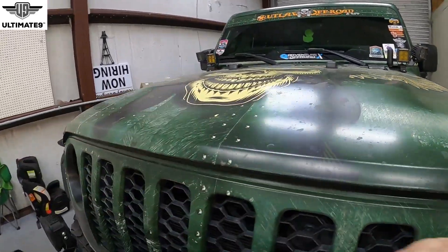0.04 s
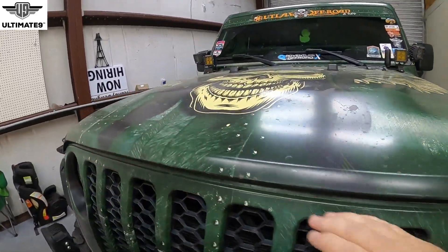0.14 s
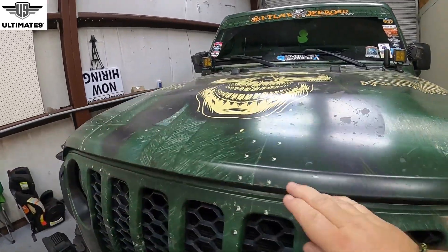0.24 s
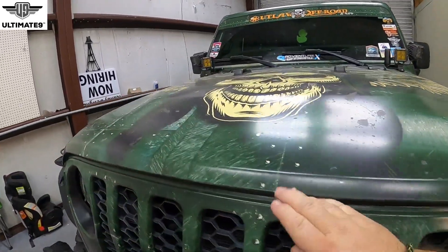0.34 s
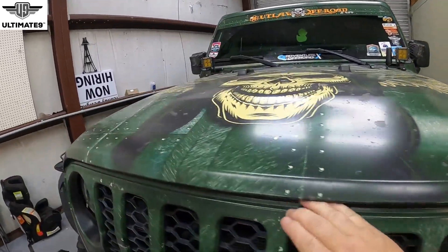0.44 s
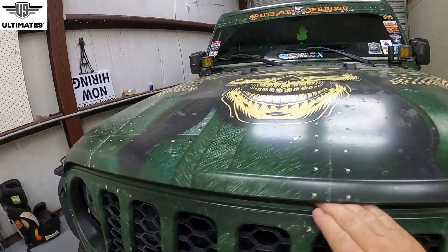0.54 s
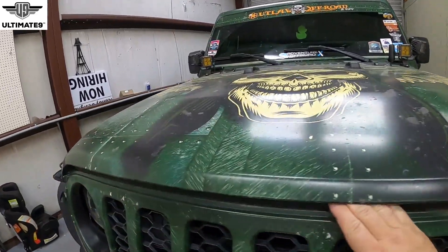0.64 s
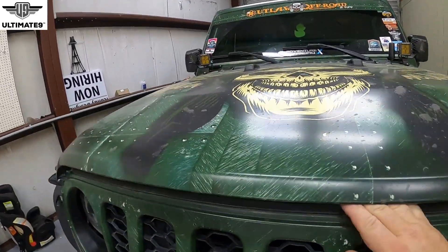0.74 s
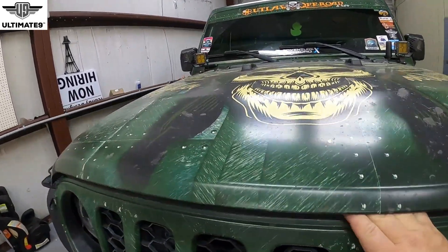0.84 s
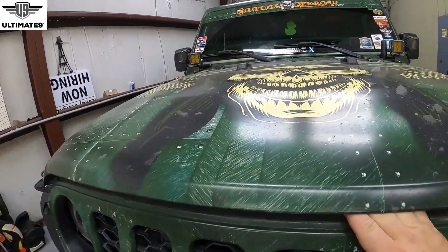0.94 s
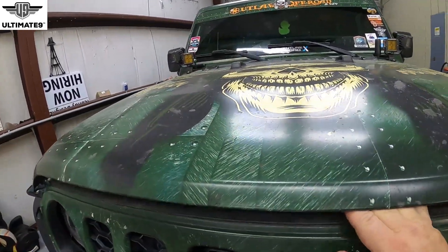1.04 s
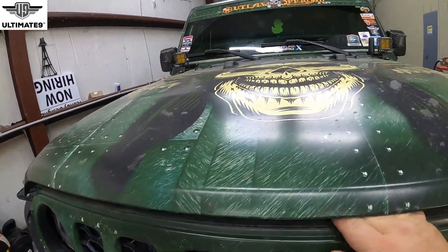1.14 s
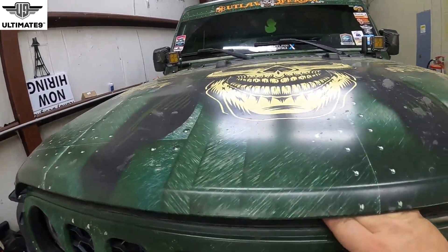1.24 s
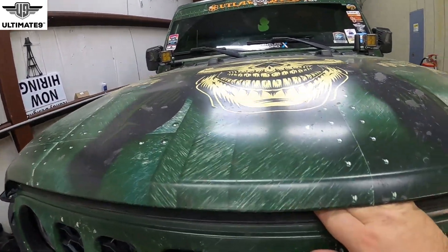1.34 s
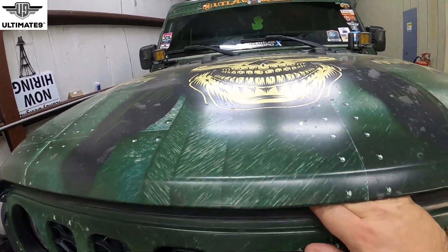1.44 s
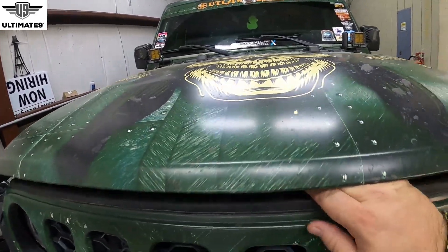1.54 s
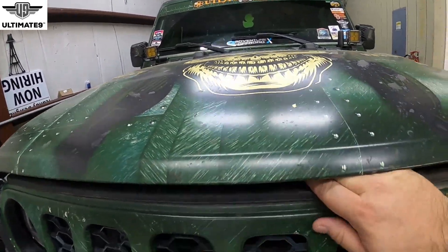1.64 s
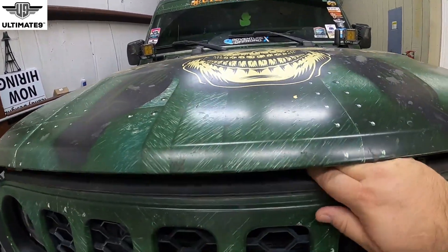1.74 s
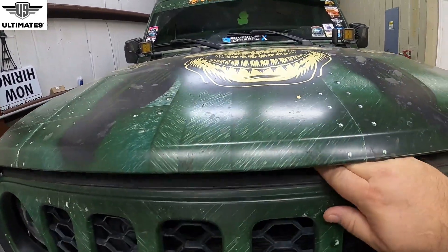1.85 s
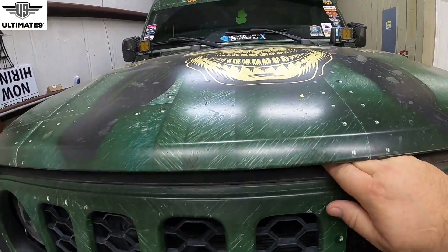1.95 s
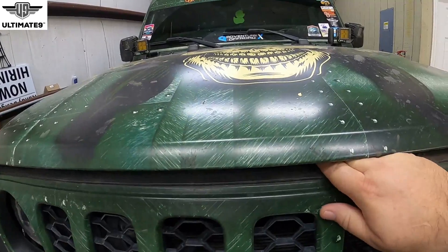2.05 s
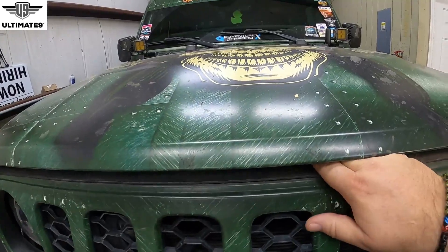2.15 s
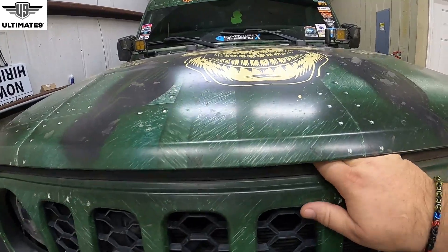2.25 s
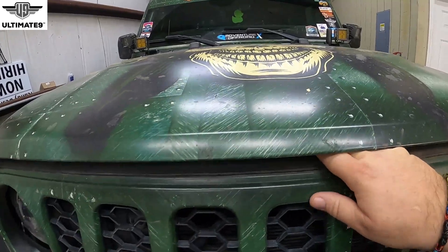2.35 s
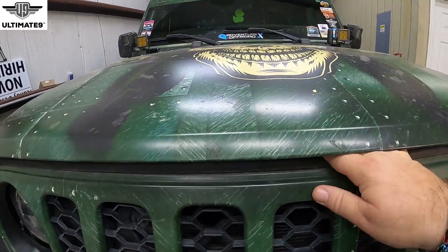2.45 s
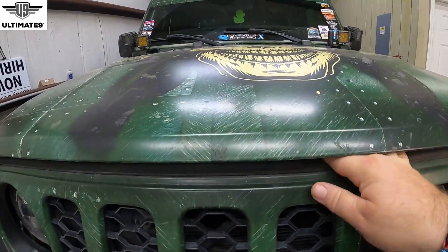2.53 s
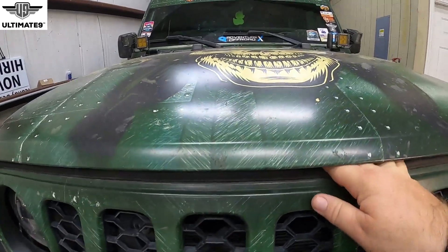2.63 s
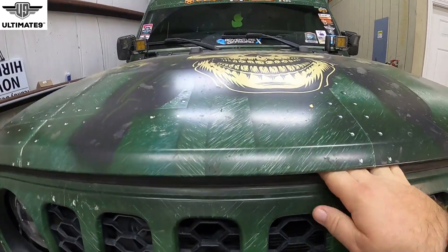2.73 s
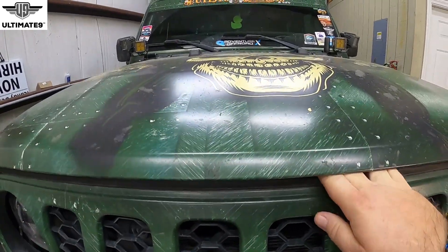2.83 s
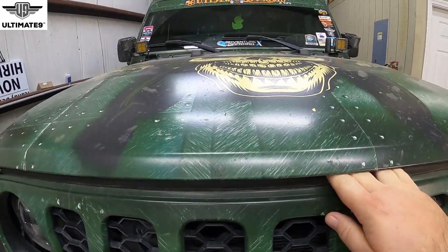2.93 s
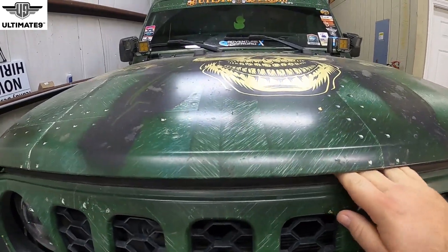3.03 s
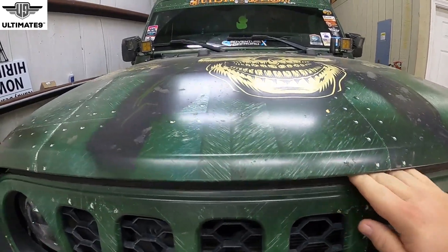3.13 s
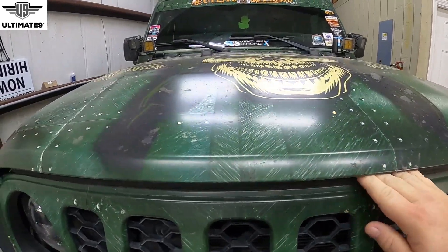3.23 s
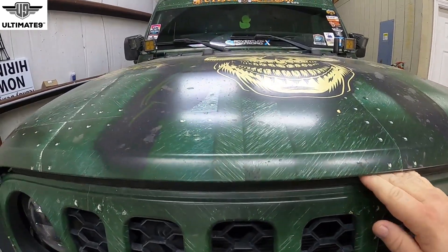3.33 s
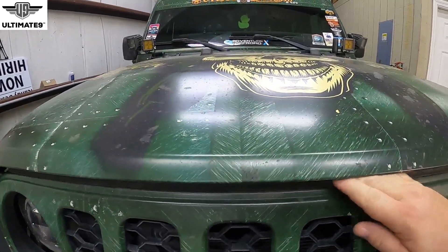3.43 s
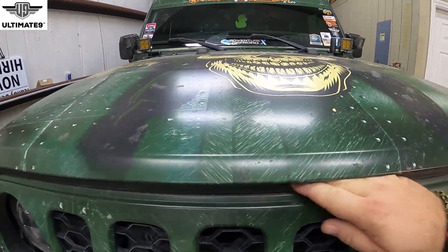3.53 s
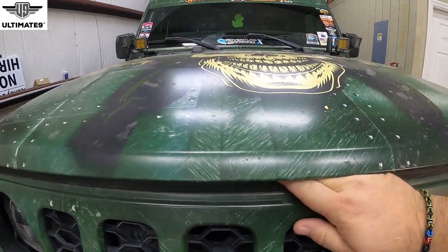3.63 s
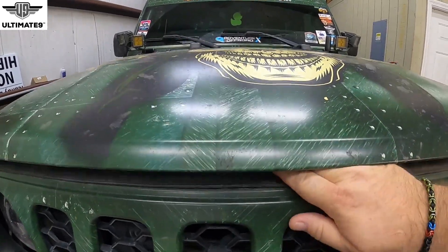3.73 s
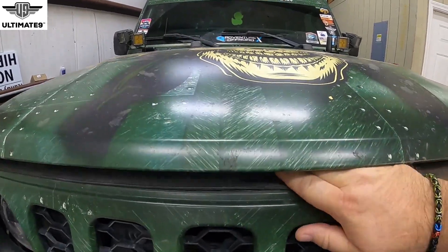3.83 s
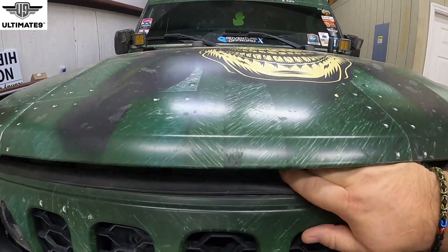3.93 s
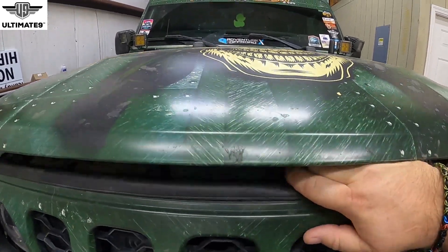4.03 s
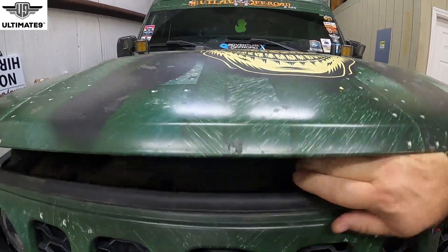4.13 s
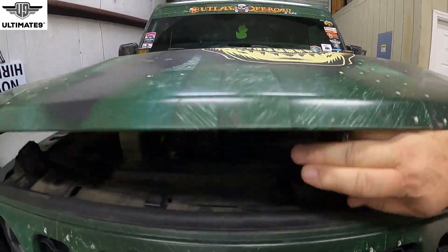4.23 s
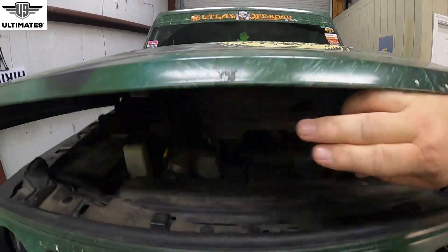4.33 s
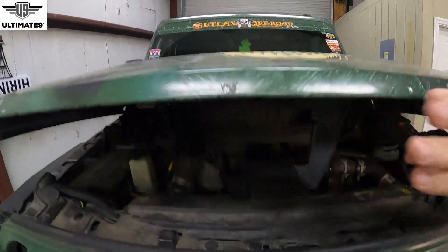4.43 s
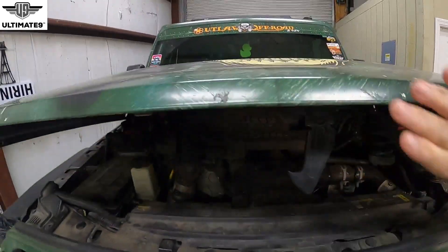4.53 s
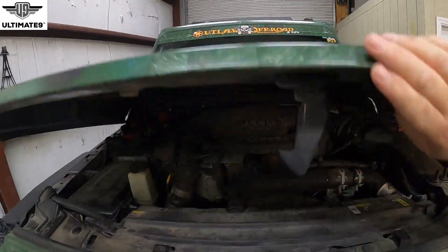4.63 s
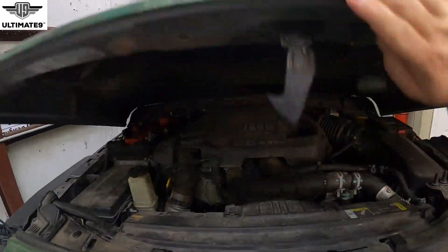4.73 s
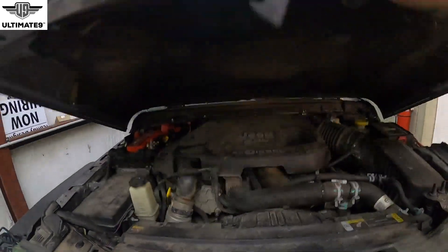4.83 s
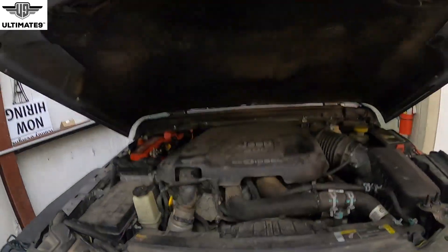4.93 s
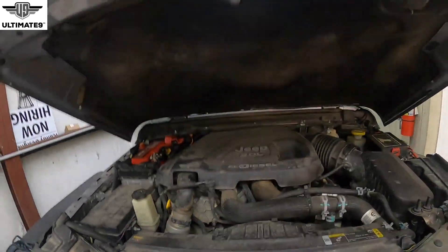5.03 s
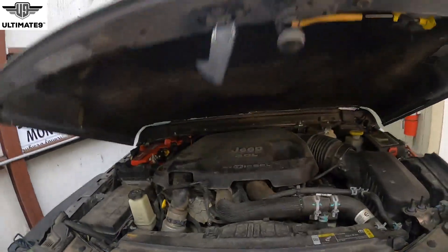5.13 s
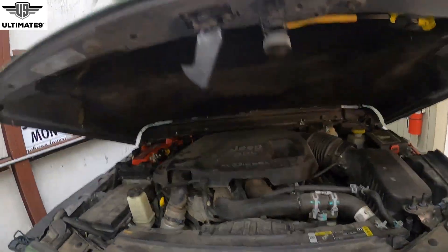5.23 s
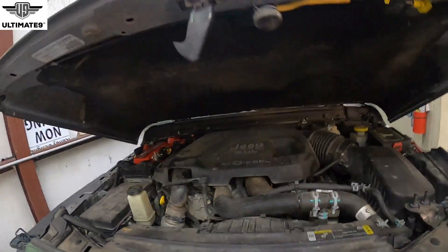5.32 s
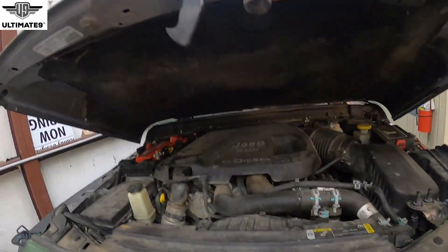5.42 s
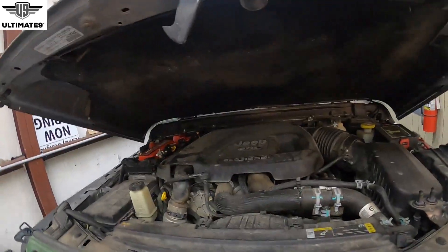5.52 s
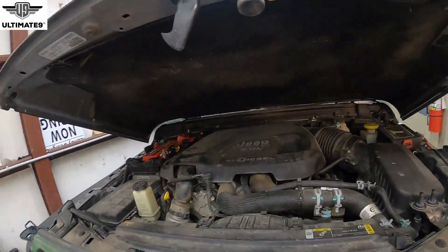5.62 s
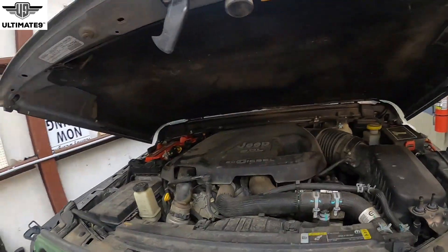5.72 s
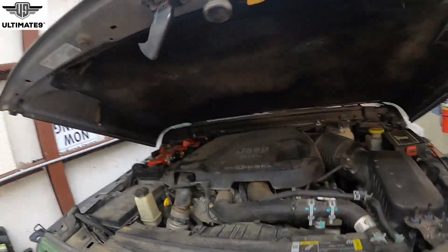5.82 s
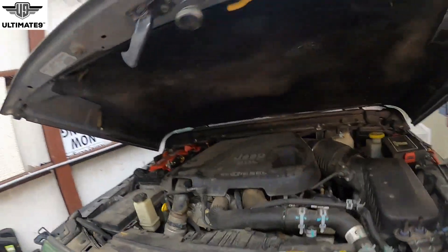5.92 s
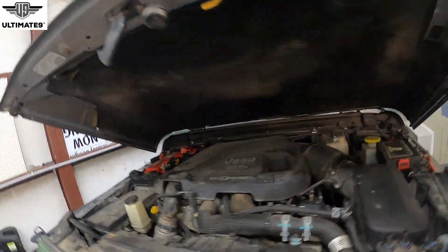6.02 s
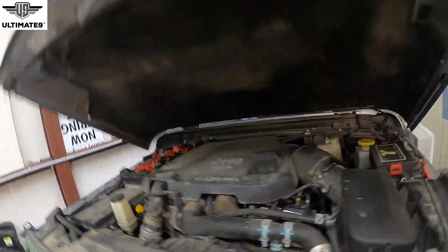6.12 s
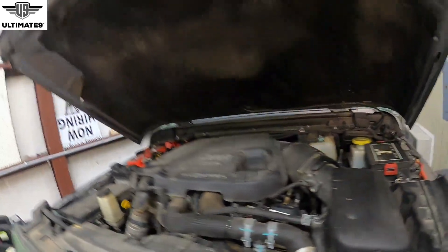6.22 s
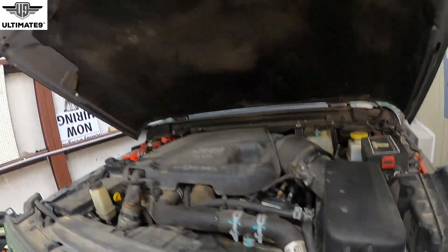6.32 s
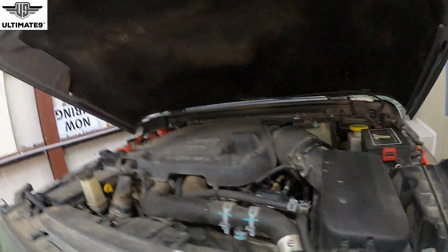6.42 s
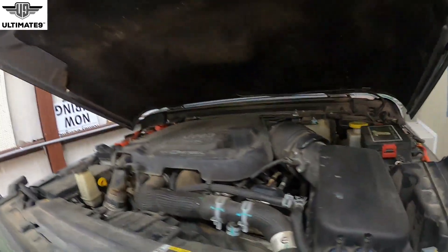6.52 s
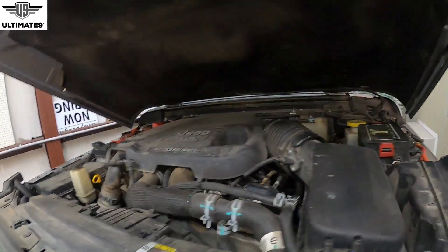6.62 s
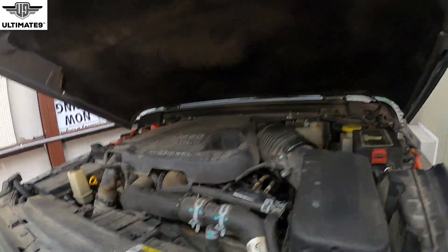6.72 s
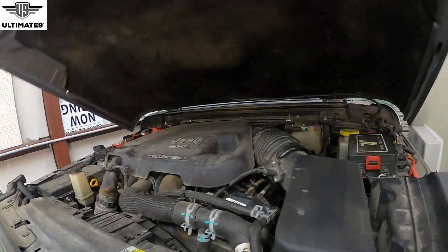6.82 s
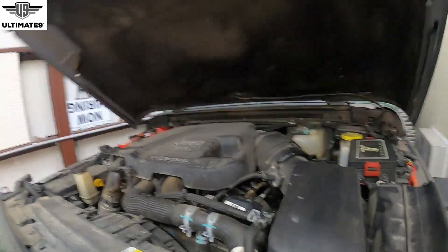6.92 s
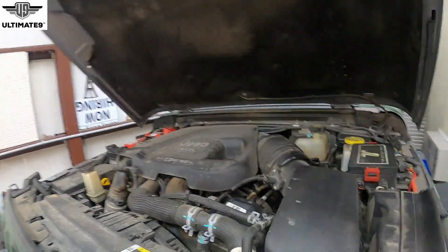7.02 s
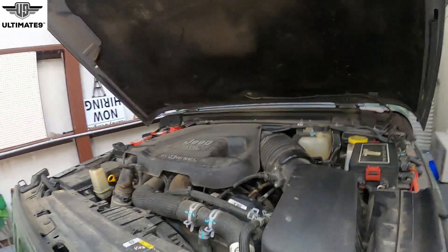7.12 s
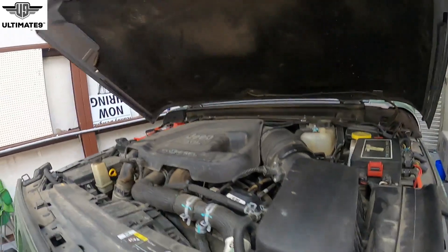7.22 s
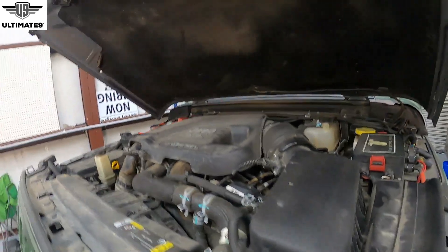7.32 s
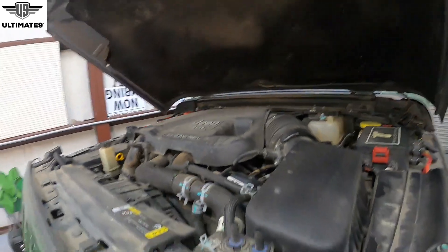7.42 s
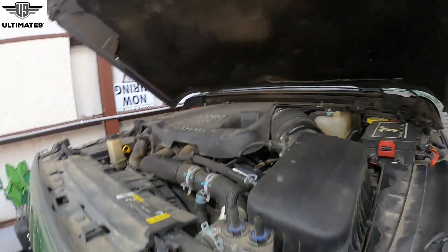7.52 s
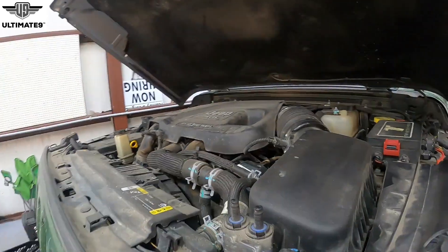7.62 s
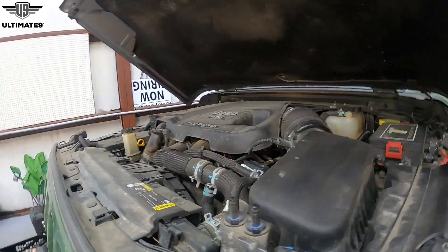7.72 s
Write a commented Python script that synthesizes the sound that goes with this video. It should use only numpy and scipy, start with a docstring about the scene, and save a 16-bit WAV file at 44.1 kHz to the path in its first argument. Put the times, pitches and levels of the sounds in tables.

```python
"""Knocks on a vehicle hood, close to the microphone: a hand works the catch and swings the hood up.
Each knock rings tuned modes of latch, panel and whole hood, with bursts of noise for snap and clank.
Handling and steps add thuds (low wobbling tones) and scuffs (grainy noise); fingertips squeak on the
paint; gritty noise through resonances swells briefly into the loudest latch knock and fades after it.
The place is a large sheet-metal garage: a dull noise tail, rumble, steady hiss and a faint hum."""
import sys
import numpy as np
from scipy import signal
from scipy.fft import rfft, irfft, next_fast_len
from scipy.io import wavfile

SR = 44100
rng = np.random.default_rng(int(sys.argv[2]) if len(sys.argv) > 2 else 0)


def transcribe(u):
    """Save the signal u as a 16-bit wav file named by the first command-line argument.

    u: samples, shape (n,) or (channels, n), limited to [-1, 1]; the rate is SR.
    q: integer samples, one column per channel.
    """
    v = np.clip(np.atleast_2d(u).T, -1, 1)
    q = np.round(v * 32767).astype(np.int16)
    wavfile.write(sys.argv[1], SR, q)


N = 342247   # samples


def from_db(db):
    """Gain of a level in dB."""
    return 10 ** (np.asarray(db) / 20)


def rms_one(x):
    """Scaled to rms 1."""
    return x / np.sqrt(np.mean(x ** 2) + 1e-20)


def level_curve(rows):
    """Level in dB at every sample, straight lines between the (time_s, level_db) rows."""
    time_s, level_db = np.transpose(rows)
    return np.interp(np.arange(N) / SR, time_s, level_db)


def drift(rate_hz):
    """Slow chance: noise at every 40th sample through a double one-pole low-pass; spread 1."""
    r = np.exp(-2 * np.pi * rate_hz * 40 / SR)
    noise = rng.standard_normal(N // 40 + 2002)
    slow = signal.lfilter([1], [1, -2 * r, r * r], noise)[2000:]   # the settling is dropped
    return np.interp(np.arange(N) / 40, np.arange(len(slow)), rms_one(slow))


def resonance(x, hz, width_hz):
    """Two-pole band with gain 1 on top."""
    r = np.exp(-np.pi * width_hz / SR)
    poles = [1, -2 * r * np.cos(2 * np.pi * hz / SR), r * r]
    return signal.lfilter([(1 - r * r) / 2, 0, (r * r - 1) / 2], poles, x)


def coloured(x, spectrum):
    """Shapes a signal by a spectrum of (frequency_hz, level_db) points."""
    size = next_fast_len(len(x))
    hz = np.arange(size // 2 + 1) * SR / size + 1   # the 1 keeps the logarithm finite
    points = np.array(spectrum)
    shape_db = np.interp(np.log(hz), np.log(points[:, 0]), points[:, 1], left=-90)
    return irfft(rfft(x, size) * from_db(shape_db), size)[:len(x)]


def banded(x, patchy_db, tilt_db=0):
    """Octave bands that flicker a little on their own and tilt about 2.5 kHz; input scaled to rms 1."""
    out, edges = 0, 18 * 2. ** np.arange(11)   # Hz
    for low, high in zip(edges, edges[1:]):
        band = signal.sosfilt(signal.butter(2, [low, high], "band", fs=SR, output="sos"), x)
        octaves = np.clip(np.log2(np.sqrt(low * high) / 2500), -2, 1.4)
        gain = from_db(patchy_db * drift(14) + tilt_db * octaves)
        out = -out + band * gain   # alternating signs leave no gaps between bands
    return out / np.sqrt(np.mean(x ** 2))


# low rumble of the hall and of the held microphone: time_s [s], level_db [dB]
RUMBLE_LEVEL = [(0.0, -38.5), (0.69, -37.5), (0.97, -35), (1.58, -42), (1.75, -30), (1.88, -30),
                (2.03, -41), (2.2, -38.5), (2.61, -39), (3.54, -40), (3.93, -35), (4.23, -34), (4.36, -37),
                (5.23, -43), (6.2, -40), (6.59, -42.5), (6.81, -42.5), (7.41, -39), (7.76, -44)]
# rumble spectrum: frequency_hz [Hz], relative_density_db [dB per Hz]
RUMBLE_SPECTRUM = [(12, -33), (20, 8), (53, 3), (161, -4.5), (211, -4.5), (236, -7), (325, -18),
                   (369, -24.5), (406, -21.5), (549, -31), (698, -33), (900, -52), (1170, -62),
                   (1980, -120)]
# steady hall hiss: frequency_hz [Hz], relative_density_db [dB per Hz]
HISS_SPECTRUM = [(350, -32.5), (600, -5), (940, -2.5), (1320, -0.5), (2540, -11), (5290, -13), (7640, -20),
                 (8870, -15.5), (11300, -26), (13500, -36), (15500, -53.5)]
HISS_DB = -63.5   # rms
# hum of the hall: pitch_hz [Hz], width_hz [Hz], level_db [dB rms]
HUM_TONES = [(223.1, 2, -50), (376, 1.1, -59.5), (454, 1.8, -68)]


def background():
    """Lumpy rumble, smooth hiss and a few wavering hum tones, all filtered noise."""
    rumble = banded(coloured(rng.standard_normal(N), RUMBLE_SPECTRUM), patchy_db=0.4)
    out = from_db(level_curve(RUMBLE_LEVEL)) * rumble
    out += from_db(HISS_DB) * rms_one(coloured(rng.standard_normal(N), HISS_SPECTRUM))
    for hz, width_hz, level_db in HUM_TONES:
        # a very narrow band of noise is heard as a tone that wavers
        out += from_db(level_db) * rms_one(resonance(rng.standard_normal(N), hz, width_hz))
    return out


# scuffs of hand, cloth and shoes; rise and fall are the times from and to STROKE_DROP_DB under the
# peak, before they are shortened by the shares below: loudest_s [s], peak_db [dB], rise_s [s],
# fall_s [s], brightness [dB per octave], rattle_db [dB]
SCUFF_STROKES = [(0.122, -57, 0.46, 0.37, 3.5, -54.5), (0.395, -61, 0.098, 0.074, 11, -40.5),
                 (0.517, -47, 0.036, 0.11, 1.5, -47), (0.63, -52, 0.64, 0.63, -1, -60),
                 (0.788, -42.5, 0.11, 0.11, -2.5, -31), (0.92, -57, 0.16, 0.13, -2, -38.5),
                 (1.08, -50, 0.1, 0.27, -1.5, -46), (1.229, -49.5, 0.13, 0.13, -1, -34.5),
                 (1.42, -54, 0.21, 0.25, -3.5, -82), (1.703, -43.5, 0.18, 0.33, -1, -51),
                 (1.963, -65, 0.013, 0.074, -16, -40), (2.034, -52.5, 0.022, 0.092, -7.5, -55),
                 (2.166, -53, 0.015, 0.035, -6, -36), (2.307, -52, 0.14, 0.13, -4, -46),
                 (2.37, -57, 0.044, 0.16, 0, -66), (2.49, -62.5, 0.092, 0.16, -1.5, -59),
                 (2.63, -59.5, 0.061, 0.083, 2, -49), (2.69, -53.5, 0.14, 0.064, 0.5, -52),
                 (2.809, -55.5, 0.088, 0.24, -5, -46), (3.1, -60, 0.41, 0.1, -2.5, -49),
                 (3.271, -50.5, 0.16, 0.093, 0.5, -31.5), (3.42, -56.5, 0.13, 0.13, 1, -51.5),
                 (3.57, -49, 0.083, 0.52, -1, -62), (3.68, -49, 0.35, 0.56, 0, -76),
                 (3.82, -52.5, 0.059, 0.12, -14, -48), (3.897, -59, 0.027, 0.068, -6, -53),
                 (4.071, -43.5, 0.1, 0.38, -3.5, -42), (4.31, -49.5, 0.034, 0.68, 3, -53),
                 (4.53, -52, 0.028, 0.36, -3, -36), (4.617, -38.5, 0.18, 0.068, -4, -37.5),
                 (4.761, -62, 0.031, 0.12, 5, -38), (5.022, -50.5, 0.16, 0.13, 2.5, -45),
                 (5.258, -41, 0.094, 0.14, -1.5, -33), (5.388, -33.5, 0.055, 0.16, -2.5, -53.5),
                 (5.549, -55, 0.69, 0.17, 3, -79.5), (5.701, -51.5, 0.073, 0.098, -4, -55),
                 (6.059, -60.5, 0.097, 0.17, 2.5, -45), (6.141, -55.5, 0.12, 0.12, 1, -64),
                 (6.19, -41.5, 0.058, 0.15, -1, -57), (6.24, -46.5, 0.13, 0.34, -0.5, -64),
                 (6.329, -47, 0.079, 0.068, -6, -35.5), (6.505, -48.5, 0.1, 0.061, -1.5, -41.5),
                 (6.54, -63, 0.057, 0.093, 11, -45), (6.64, -55.5, 0.36, 0.25, 0.5, -49.5),
                 (6.809, -56.5, 0.0092, 0.11, -2, -63), (7.022, -57.5, 0.17, 0.097, 3.5, -72),
                 (7.099, -42.5, 0.079, 0.047, -6, -43.5), (7.16, -55.5, 0.31, 0.065, -0.5, -47.5),
                 (7.25, -63.5, 0.15, 0.033, 5, -51), (7.356, -54, 0.27, 0.22, -2, -44),
                 (7.55, -61.5, 0.049, 0.093, -1, -51), (7.655, -51, 0.13, 0.2, -1, -47)]
STROKE_DROP_DB, STROKE_ROUNDNESS = 20, 1.42   # roundness: 1 pointed, 2 round
RUB_SHARE, RATTLE_SHARE = 0.73, 0.54   # share of the rise and fall times


def strokes(order, share):
    """Power of each scuff, every 32nd sample: it swells to its peak and falls away."""
    rows, t = np.array(SCUFF_STROKES), np.arange(0, N + 32, 32) / SR
    late = t - rows[:, :1]
    side_s = np.where(late < 0, rows[:, 2:3], rows[:, 3:4])
    away = np.abs(late) / (share * np.maximum(side_s, .003))
    level_db = rows[:, order, None] - STROKE_DROP_DB * away ** STROKE_ROUNDNESS
    return from_db(2 * np.maximum(level_db, -150))   # doubled dB: power


# rubbing noise: frequency_hz [Hz], relative_density_db [dB per Hz]
SCUFF_SPECTRUM = [(180, -23.5), (300, -13.5), (337, -24), (366, -14.5), (424, -14.5), (461, -15.5),
                  (641, -7.5), (696, -8), (2000, -0.5), (3810, -3), (7750, -15.5), (8840, -13),
                  (13100, -22.5), (15500, -43)]
# cavity under the hood lip: pitch_hz [Hz], width_hz [Hz], relative_level_db [dB]
CAVITY_PEAKS = [(1200, 190, -2), (2370, 500, -3.5), (4680, 320, -12)]
# fingers in the cavity: time_s [s], cavity_level_db [dB]
CAVITY_REACH = [(0, -18.5), (1.5, -9), (1.65, -13.5), (2.2, 2), (3.0, 9), (3.6, -3), (4.0, -2.5),
                (4.3, -26.5), (7.76, -12)]
# panel rattle: frequency_hz [Hz], relative_density_db [dB per Hz]
RATTLE_SPECTRUM = [(200, -23), (350, 7.5), (600, 3.5), (1000, -6), (1600, -8), (2500, -43.5), (5000, -75.5)]


def scuffs():
    """Rubbing: dense tiny slips blend into a grainy hiss; heavier handling rattles the panel."""
    rub, shake = strokes(order=1, share=RUB_SHARE), strokes(order=5, share=RATTLE_SHARE)
    brightness = np.array(SCUFF_STROKES)[:, 4] @ rub / rub.sum(0)   # the louder stroke decides
    slow = np.sqrt(rub.sum(0)), brightness, np.sqrt(shake.sum(0))
    level, tilt_db, rattle = (np.interp(np.arange(N) / 32, np.arange(len(c)), c) for c in slow)

    slips = rng.standard_normal(N) * from_db(3.58 * np.minimum(rng.exponential(1, N), 4))
    grain = coloured(slips * from_db(2.08 * drift(12)), SCUFF_SPECTRUM)
    cavity = sum(from_db(db) * resonance(grain, hz, width_hz) for hz, width_hz, db in CAVITY_PEAKS)
    grain += from_db(level_curve(CAVITY_REACH)) * cavity
    hiss = level * banded(grain, patchy_db=.7, tilt_db=tilt_db)

    # about 2500 random taps per second
    taps = rng.standard_normal(N) * (rng.random(N) < 2500 / SR) * from_db(2.5 * drift(30))
    return hiss + rattle * rms_one(coloured(taps, RATTLE_SPECTRUM))


CONTACT_MS = 2.1   # a touch builds up its force over this time


def contact(span_s):
    """Force of a touch: builds up over the contact time, then lets go; top 1."""
    u = span_s * 1000 / CONTACT_MS
    return u * np.exp(1 - u)


def start(knock):
    """First sample of a touch; the table gives the moment of greatest force."""
    return round((knock[0] - CONTACT_MS / 1000) * SR)


# the hand on the hood alters how long it rings: time_s [s], ring_share [share of the table's ring time]
HAND_GRIP = [(0, 1), (0.75, 0.83), (0.9, 0.72), (1.24, 0.49), (1.7, 0.85), (2.2, 1.06), (3.0, 1.1),
             (3.23, 0.74), (3.26, 0.7), (3.75, .8), (4.09, 0.93), (4.25, 0.8), (4.6, 0.83), (5.23, 0.97),
             (5.36, 1.15), (6.04, 0.69), (6.33, .7), (6.5, 1.2), (7.1, 0.53), (7.76, .9)]


def ring_share(knock):
    """How freely the metal rings at the moment of a knock."""
    return np.clip(np.interp(knock[0], *np.transpose(HAND_GRIP)), .2, 2)


# knocks: force_peak_s [s], latch_db [dB], panel_db [dB], boom_db [dB], snap_db [dB],
# latch_sharpness [dB per octave], panel_sharpness [dB per octave]; levels relative within each layer
KNOCK_EVENTS = [(0.38, -76.5, -39.5, -32, -53.5, 0, -10.5), (0.514, -40, -60, -63, -40, -5, 5),
                (0.726, -55, -61, -49, -61, 15.5, -14), (0.765, -53, -47, -46, -62, -2, -5),
                (0.779, -37, -56, -50, -52, 2, -3), (0.782, -36, -35, -35.5, -47, 3, -10.5),
                (0.798, -66, -31, -28, -59, -15, -6), (0.822, -63, -30, -29, -65, -8, -5),
                (0.884, -34, -32, -21.5, -50, -3, 19), (0.895, -49, -30.5, -25.5, -54, -5, 4),
                (1.073, -65, -42.5, -36.5, -79.5, 14, 6), (1.166, -51, -56, -50, -70, -6, -2),
                (1.186, -48, -50, -50.5, -70, -11, 0), (1.216, -61, -41, -31, -63, -3, -21.5),
                (1.238, -35, -60, -30.5, -47, 5.5, -11), (1.462, -45.5, -39.5, -41, -78, 0, -7),
                (1.706, -48, -39, -48, -55, 0, 0), (1.713, -38, -38, -35.5, -48, 14.5, 2),
                (1.717, -21.5, -16, -12.5, -27.5, 3.5, 11), (1.893, -54, -56, -40, -60, 9, -2),
                (1.957, -47.5, -45, -28.5, -57, -7, -2), (2.035, -66, -43, -32, -55, -4, -6),
                (2.167, -58, -40.5, -40, -81, -8, -1), (2.195, -47.5, -38.5, -27.5, -80, -17, -6),
                (2.303, -49.5, -41, -31, -64, -21, -4), (2.506, -62, -70, -55, -49.5, 2, -2),
                (2.776, -58, -40, -32, -77, -10, 2), (2.93, -50.5, -50.5, -44.5, -69, 0, -15),
                (2.965, -53, -63, -48, -78, 2, 2), (3.007, -52, -61, -45, -75, -1, -2),
                (3.164, -54, -57, -36, -68, 5, -3), (3.23, -31, -19, -15, -61, -22, -4.5),
                (3.256, -41.5, -19.5, -28.5, -60, -30.5, -1.5), (3.371, -52, -49, -38, -53, -9, -13),
                (3.694, -60, -56.5, -37, -43, 11, 8.5), (3.727, -35, -30, -43, -47, -8, -1.5),
                (3.817, -44, -32, -34.5, -52, 7, -12.5), (3.892, -41, -42.5, -35.5, -50, 9.5, -20),
                (4.086, -22.5, -18.5, -27.5, -28.5, 2, 9.5), (4.094, -33, -41.5, -45.5, -42.5, 9.5, 0),
                (4.098, -28.5, -21.5, -38, -43.5, -25, -1), (4.246, -35.5, -49.5, -52, -43, 2, 1),
                (4.259, -21.5, -36, -46, -27.5, -1.5, -0.5), (4.262, -12.5, -27.5, -40.5, -21, 6, 6),
                (4.266, -15.5, -16, -38.5, -20.5, 3, -3), (4.515, -41, -33, -38, -45, -12, 9),
                (4.58, -35.5, -30.5, -36, -43, -13, -12), (4.754, -59, -47, -22.5, -54.5, -4, 0.5),
                (5.004, -44.5, -58, -30, -40, -5, -20), (5.223, -44.5, -37.5, -21, -46, -11, -24),
                (5.249, -42, -41, -43, -60, -3, 9), (5.354, -49, -42.5, -30.5, -67, -33, 17),
                (6.036, -54, -53.5, -52.5, -73, -13, 16), (6.33, -40, -37.5, -29, -74, -1, -5),
                (6.45, -42, -29.5, -30.5, -68, 2, -22), (6.461, -60.5, -34, -36, -72, -12, -1),
                (6.512, -50, -34.5, -33.5, -72, -12, -3), (6.53, -60, -31, -32, -74, -7, -4.5),
                (6.549, -67, -37, -24.5, -74, -7, -2), (6.604, -45, -56, -37.5, -60, -11, 0.5),
                (6.805, -54, -65.5, -34.5, -64, 8, 4), (7.079, -44, -52.5, -33, -79, 8, 24.5),
                (7.228, -55.5, -61, -49, -45.5, -17, -4)]
# where a blow lands decides which modes it favours; each row goes to the nearest knock:
# knock_s [s], around_hz [Hz], extra_db [dB]
FAVOURED_MODES = [(1.165, 1700, 8), (1.185, 1120, 10), (0.884, 3500, 1), (5.25, 1314, 10), (5.25, 1700, 12),
                  (5.354, 590, 6.5), (4.093, 3150, 5.5), (4.086, 450, 5.5), (1.718, 400, 1.5),
                  (1.718, 674, 2.5), (3.255, 516, 2), (0.726, 2570, 19.5), (0.778, 2600, 3),
                  (0.797, 660, 8), (0.797, 850, 8), (0.884, 3020, 13), (1.718, 3050, 2), (1.718, 573, -1),
                  (1.718, 1150, 5), (1.718, 200, -4), (3.23, 200, -3), (3.23, 1130, 8), (3.23, 1040, -4),
                  (3.23, 780, -6), (1.718, 1500, 4.5), (1.718, 5300, -12), (1.718, 292, 3.5),
                  (3.23, 425, -2), (3.255, 200, -3), (3.255, 624, 1), (3.255, 910, 12), (3.255, 1090, 3),
                  (4.098, 610, 6), (4.086, 776, -7.5), (4.258, 927, -8), (4.263, 924, -14.5),
                  (4.263, 770, -11.5), (4.266, 768, -11), (4.266, 926, -11), (4.266, 384, 8.5),
                  (4.266, 596, 9), (4.266, 228.6, 5.5), (4.263, 3093, 6), (6.514, 1020, 14),
                  (0.782, 2530, 19), (0.884, 1200, -1), (0.895, 600, 6), (0.895, 457, 4),
                  (1.238, 1060, 14.5), (1.238, 2450, 3), (1.958, 1200, 6.5), (1.718, 1660, 8.5),
                  (1.718, 475, 1), (1.718, 750, 5), (1.718, 2230, 17), (2.035, 1201, 8), (2.035, 2265, 6),
                  (2.196, 1560, 22), (3.23, 594, -6), (3.23, 915, 5), (3.255, 295, 6.5), (3.255, 750, 15),
                  (3.255, 477, 10.5), (3.727, 370, -21), (3.818, 1900, -7), (3.818, 240, 1.5),
                  (3.892, 480, -15), (4.086, 910, 5.5), (4.086, 1130, 8.5), (4.086, 643, 7),
                  (4.086, 1700, -12), (4.086, 3100, 7), (4.247, 1520, 16.5), (4.258, 1504, 15.5),
                  (4.263, 1314, 7.5), (4.263, 1472, 13), (4.263, 1052, -11), (4.098, 970, 16),
                  (4.098, 1316, -6), (4.266, 295, 1.5), (4.266, 1997, 8.5), (4.266, 3104, -2.5),
                  (4.266, 639, -6.5), (4.266, 458, 9.5), (4.086, 382, -1.5), (4.086, 585, 4.5),
                  (6.035, 745, 24), (6.331, 980, 10), (6.45, 193, -11.5), (6.462, 193, -9),
                  (6.462, 515, 12), (6.514, 193, -7), (6.45, 503, 2), (6.53, 610, 9.5), (4.755, 650, 2),
                  (5.354, 640, 4), (7.078, 1050, 23)]
FAVOUR_OCTAVES = 0.1   # reach of the favour


def blows(order, modes, slope=None, centre_hz=1):
    """Level of each knock on each mode in dB: sharp blows favour high modes, and each spot its own."""
    rows, pitches = np.array(KNOCK_EVENTS), np.log2(np.array(modes)[:, 0])
    sharpness = rows[:, slope, None] if slope else 0
    levels = rows[:, order, None] + sharpness * (pitches - np.log2(centre_hz))
    for s, hz, extra_db in FAVOURED_MODES:
        nearest = np.argmin(np.abs(rows[:, 0] - s))
        reach = np.exp(-((pitches - np.log2(hz)) / FAVOUR_OCTAVES) ** 2)
        levels[nearest] += extra_db * reach
    return levels


DETUNE = .004   # typical share by which a mode's pitch differs from blow to blow


def struck(modes, blow_db, spread_db, rough, band_hz):
    """Every knock pushes every mode with a strength of its own; the contact chatters."""
    out, span = np.zeros(N + 2 * SR), np.arange(1024) / SR
    chatter = rng.standard_normal((len(KNOCK_EVENTS), len(span)))
    luck = rng.standard_normal((len(KNOCK_EVENTS), len(modes), 2))   # strength, pitch
    force = contact(span)
    pushes = rough * chatter * force / np.sqrt(np.sum(force ** 2))
    pushes[:, round(CONTACT_MS * SR / 1000)] -= 1   # the firm blow at the height of the contact
    for m, (hz, level_db, t60_s) in enumerate(modes):
        # dividing by what the mode feels: chatter blurs the attack, not the strength
        felt = np.maximum(np.abs(pushes @ np.exp(2j * np.pi * hz * span)), .5)
        for e, knock in enumerate(KNOCK_EVENTS):
            ring_s = min(t60_s * ring_share(knock), 1)
            r = from_db(-60 / (ring_s * SR))
            w = 2 * np.pi * hz * (1 + DETUNE * luck[e, m, 1]) / SR
            gain = from_db(blow_db[e, m] + level_db + spread_db * luck[e, m, 0])
            push = np.pad(pushes[e], (0, round(ring_s * SR))) / felt[e] * gain
            ring = signal.lfilter([0, np.sin(w)], [1, -2 * r * np.cos(w), r * r], push)
            out[start(knock):][:len(push)] += ring
    # little is radiated outside the modes
    return signal.sosfilt(signal.butter(2, band_hz, "band", fs=SR, output="sos"), out[:N])


# catch and striker: pitch_hz [Hz], relative_level_db [dB], free_t60_s [s]
LATCH_MODES = [(910, -6.5, 0.14), (1050, 2.5, 0.13), (1140, -7.5, 0.21), (1317, -0.5, 0.14),
               (1499, 0, 0.097), (1671, -7.5, 0.16), (1710, -16, 0.4), (2027, -5, 0.075), (2110, -19, 0.06),
               (2270, -16.5, 0.08), (2510, -7.5, 0.076), (2710, 1, 0.036), (3080, -7.5, 0.072),
               (3440, -15.5, 0.043), (3580, -9.5, 0.11), (3760, -16.5, 0.058), (4030, -16.5, 0.08),
               (4280, -20.5, .08), (4335, -23, .08), (5160, -23, 0.079), (5700, -33.5, .1),
               (6360, -33.5, .1), (8080, -34.5, 0.072), (8500, -41.5, .07)]


def latch_ring():
    """Small stiff steel parts of the catch and striker ring high."""
    on_latch = blows(1, LATCH_MODES, slope=5, centre_hz=1500)
    return from_db(-7.5) * struck(LATCH_MODES, on_latch, spread_db=2.0, rough=1.2, band_hz=[600, 10000])


# hood skin: pitch_hz [Hz], relative_level_db [dB], free_t60_s [s]
PANEL_MODES = [(191.8, 4, 0.33), (239.7, 3, 0.23), (297.5, 2.5, 0.29), (363, 7.5, 0.12), (399, 4.5, 0.18),
               (437, -3.5, 0.12), (466, 2, 0.035), (487.5, 1, 0.11), (522.3, -4.5, 0.13), (587, 3, 0.09),
               (603, -16, 0.32), (632, -14, .18), (700, -20.5, 0.38), (733, -17, 0.15), (820, -18.5, 0.079)]


def panel_ring():
    """The thin hood skin rings in its bending modes."""
    on_panel = blows(2, PANEL_MODES, slope=6, centre_hz=350)
    return from_db(-7.5) * struck(PANEL_MODES, on_panel, spread_db=1.2, rough=0.23, band_hz=[130, 1100])


# whole hood flexing: pitch_hz [Hz], relative_level_db [dB], free_t60_s [s]
FLEX_MODES = [(35.7, -1, 0.58), (73.2, -2, 0.4), (123.17, -8.5, 0.58)]


def hood_flex():
    """The whole hood flexes slowly under each knock: a boom."""
    on_hood = blows(3, FLEX_MODES)
    return from_db(1.5) * struck(FLEX_MODES, on_hood, spread_db=1.4, rough=0.63, band_hz=[24, 250])


def bursts(blow_db, spectrum, t60_s, tail_db):
    """Noise that follows each contact and then dies away: modes too dense to tell apart."""
    envelope, span = np.zeros(N + SR // 4), np.arange(SR // 4) / SR
    force = contact(span)
    for knock, db in zip(KNOCK_EVENTS, blow_db):
        fall_db = -60 * span / (t60_s * ring_share(knock))
        tail = np.maximum.accumulate(force) * from_db(tail_db + fall_db)
        envelope[start(knock):][:len(span)] += from_db(db) * (force + tail)
    return envelope[:N] * rms_one(coloured(rng.standard_normal(N), spectrum))


# contact snap: frequency_hz [Hz], relative_density_db [dB per Hz]
SNAP_SPECTRUM = [(1760, -29), (3000, -1), (5450, -14.5), (7080, -13), (10100, -15.5), (11000, -27),
                 (14200, -29), (15500, -55.5)]
# dense sheet-metal modes, high: frequency_hz [Hz], relative_density_db [dB per Hz]
CLINK_SPECTRUM = [(1300, 0.5), (1900, 0.5), (2600, -11), (3500, -15), (4500, -44), (7000, -72)]
# dense sheet-metal modes, low: frequency_hz [Hz], relative_density_db [dB per Hz]
CLANK_SPECTRUM = [(250, -28.5), (400, 14), (600, 7), (720, -7), (860, -18.5), (1200, 2.5), (1700, -29),
                  (3000, -78.5)]
CRACK_T60_S, CLANK_T60_S = 0.074, 0.1   # before the grip


def cracks():
    """The bright snap of metal on metal and the duller clink and clank of the sheet around it."""
    _, latch_db, panel_db, _, snap_db, latch_sharp, panel_sharp = np.transpose(KNOCK_EVENTS)
    clink_db = latch_db + 0.31 * latch_sharp   # sharper blows are louder here
    clank_db = panel_db + 0.62 * panel_sharp
    snap = bursts(snap_db, SNAP_SPECTRUM, CRACK_T60_S, tail_db=-14.5)
    clink = bursts(clink_db, CLINK_SPECTRUM, CRACK_T60_S, tail_db=-9.5)
    clank = bursts(clank_db, CLANK_SPECTRUM, CLANK_T60_S, tail_db=9.5)
    return from_db(-1.5) * snap + from_db(-0.5) * clink + from_db(-11.5) * clank


# thuds of handling and steps: start_s [s], peak_db [dB], pitch_hz [Hz], push_s [s], t60_s [s]
THUD_EVENTS = [(0.4, -44, 40.2, 0.022, 0.14), (1.735, -14.5, 36.4, 0.015, 0.37),
               (3.24, -21, 198.4, 0.011, 0.16), (3.27, -15.5, 90.1, 0.021, 0.36),
               (3.31, -23, 126.8, 0.035, .2), (4.094, -27, 134, .02, .2), (4.165, -29, 202, .012, .12),
               (4.27, -26, 124, .02, .2), (4.305, -17.5, 155, 0.041, 0.11),
               (4.58, -22.5, 116.7, 0.03, 0.33), (4.767, -25.5, 67.24, 0.06, 0.4),
               (5.021, -30.5, 31.97, 0.089, 0.14), (5.224, -19, 116.7, 0.068, 0.18),
               (5.24, -13, 102.6, 0.012, 0.24), (6.448, -6, 107.4, 0.08, 0.05),
               (6.493, -13, 60, 0.015, 0.092), (6.54, -15, 40, 0.023, 0.15), (6.553, -23.5, 110, .015, .3),
               (7.309, -11.5, 32.86, 0.028, 0.34), (7.399, -31.5, 35.5, 0.029, 0.27)]


def thuds():
    """Soft heavy contacts: a low wobbling tone swells during the push and dies away."""
    out, span = np.zeros(N + SR), np.arange(SR) / SR
    wobble = drift(36)
    for s, peak_db, hz, push_s, t60_s in THUD_EVENTS:
        at = round(s * SR)
        swell = np.sin(np.pi / 2 * np.clip(span / max(push_s, .002), 0, 1)) ** .5
        fall = from_db(-60 * np.maximum(span - push_s, 0) / t60_s)
        bend = .5 * np.resize(wobble[at:], SR)   # radians
        out[at:at + SR] -= from_db(peak_db) * swell * fall * np.sin(2 * np.pi * hz * span + bend)
    return out[:N]


# fingertips squeak on the paint: start_s [s], length_s [s], pitch_hz [Hz], level_db [dB],
# second_partial_db [dB], third_partial_db [dB], partials relative to the first
SQUEAK_EVENTS = [(1.635, 0.061, 2150, -54, -22, -30), (2.162, 0.044, 394, -27.5, -23, -20.5),
                 (2.756, 0.04, 603.5, -41, -16, -29)]
SQUEAK_EDGE_S, SQUEAK_WAVER = 0.0054, 0.015   # fade in and out; typical share the pitch wavers by


def squeaks():
    """Stick-slip tones: short, nearly steady, with weak partials."""
    out, waver, flutter = np.zeros(N), drift(27), from_db(1.6 * drift(60))
    for s, length_s, hz, level_db, *partials_db in SQUEAK_EVENTS:
        at = slice(round(s * SR), round((s + length_s) * SR))
        t = np.arange(N)[at] / SR - s
        phase = 2 * np.pi * np.cumsum(hz * (1 + SQUEAK_WAVER * waver[at])) / SR
        tone = sum(from_db(db) * np.sin((k + 1) * phase) for k, db in enumerate([0, *partials_db]))
        fade = np.clip(np.minimum(t, length_s - t) / SQUEAK_EDGE_S, 0, 1)
        out[at] += from_db(level_db) * fade * flutter[at] * tone
    return out


# resonances that colour the grit: pitch_hz [Hz], width_hz [Hz], relative_level_db [dB]
GRIT_PEAKS = [(1305, 60, 1), (1495, 140, 6), (1704, 200, 5.5), (1990, 87, 1.5), (2280, 130, -2.5),
              (2740, 130, -3.5), (3240, 200, -6), (3947, 300, -5), (4410, 250, -12.5), (5670, 500, -10.5),
              (6500, 400, -15.5), (8520, 1800, -19.5), (12500, 2500, -35)]
# a short swell of grit into the loudest latch knock, then a fading tail: start_s [s], level_db [dB],
# attack_s [s], hold_s from the start [s], fall [dB per s], brightness [dB per octave]
GRIT_SWELLS = [(4.23, -32.5, 0.013, .012, 411, 4), (4.244, -21, 0.0092, 0.017, 1498, 6.5),
               (4.274, -37.5, .02, 0.09, 150, -1), (4.328, -47.5, 0.043, 0.094, 146, 0)]


def gritty_swells():
    """Gritty noise through resonances: each swell sets in, holds, dies away."""
    grains_db = 2.0 * np.minimum(rng.exponential(1, N), 4)
    grit = rng.standard_normal(N) * from_db(grains_db + 1.5 * drift(60))
    sung = []
    for hz, width_hz, level_db in GRIT_PEAKS:
        broad = resonance(grit, hz, 2 * width_hz)
        sung.append(from_db(level_db) * resonance(broad, hz, width_hz))
    sung = np.array(sung)
    octaves, out = np.log2(np.array(GRIT_PEAKS)[:, 0] / 1500), 0
    for s, level_db, attack_s, hold_s, fall, bright in GRIT_SWELLS:
        t = np.arange(N) / SR - s
        gate = np.clip(t / attack_s, 0, 1) * from_db(level_db - fall * np.maximum(t - hold_s, 0))
        out = out + gate * rms_one(from_db(bright * octaves) @ sung)
    return out


HALL_T60_S, HALL_CUT_HZ, HALL_DB = 0.25, 420, -27.5


def hall(x):
    """Diffuse tail: decaying noise as the room response, dulled by the walls."""
    t = np.arange(round(1.5 * SR)) / SR
    onset = np.clip((t - .012) / .03, 0, 1)   # silent for 12 ms, then fades in over 30 ms
    tail = rng.standard_normal(len(t)) * from_db(-60 * t / HALL_T60_S) * onset
    tail = signal.lfilter(*signal.butter(1, HALL_CUT_HZ, fs=SR), tail)
    return signal.fftconvolve(x, tail / np.sqrt(np.sum(tail ** 2)))[:N]


def scene():
    """Knocks, thuds and squeaks near the microphone, their hall tail, rubbing, grit and background."""
    near = latch_ring() + panel_ring() + hood_flex() + cracks() + thuds() + squeaks()
    return (near + from_db(HALL_DB) * hall(near) + scuffs() + gritty_swells() + background())[None]


# microphone response: frequency_hz [Hz], gain_db [dB]
MICROPHONE_RESPONSE = [(10, -6), (6000, -6), (7900, -8.5), (8800, -5.5), (11000, -12.5), (13000, -8),
                       (16000, -22.5)]
CUTOFF_HZ = 15900   # 60 dB down from here up


def record(dry):
    """Microphone colour; the deepest rumble is cut, the highest peaks are rounded, the top is cut."""
    heard = coloured(dry[0], MICROPHONE_RESPONSE)
    heard = signal.sosfilt(signal.butter(2, 25, "high", fs=SR, output="sos"), heard)
    rounded = heard / (1 + (heard / .95) ** 4) ** .25
    return signal.sosfilt(signal.cheby2(20, 60, CUTOFF_HZ, fs=SR, output="sos"), rounded)[None]


dry = scene()
out = record(dry)
transcribe(out)
```